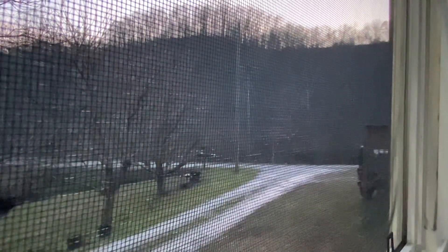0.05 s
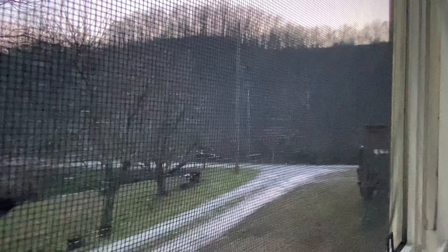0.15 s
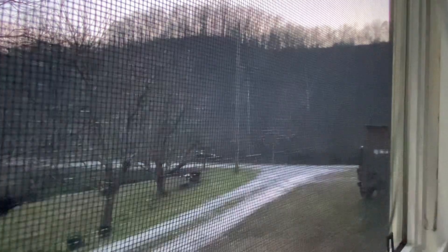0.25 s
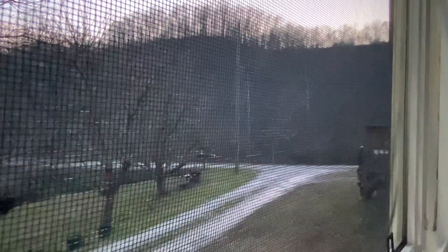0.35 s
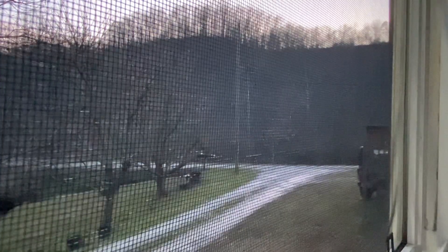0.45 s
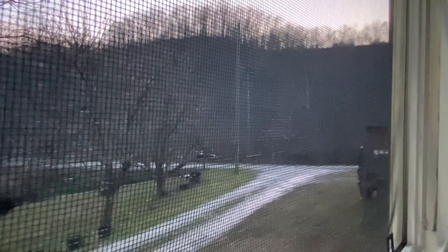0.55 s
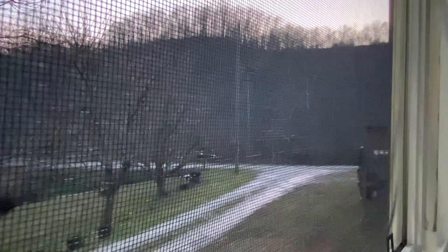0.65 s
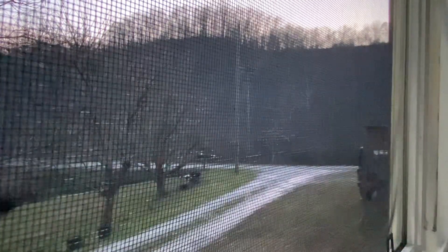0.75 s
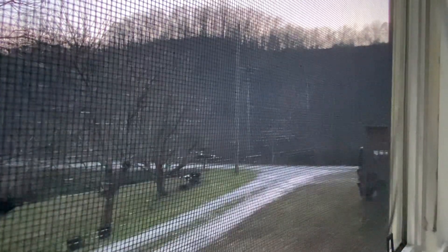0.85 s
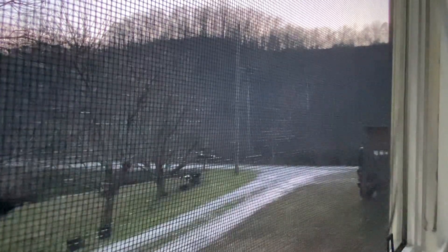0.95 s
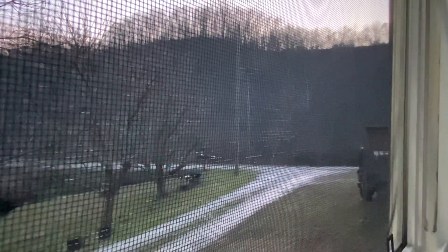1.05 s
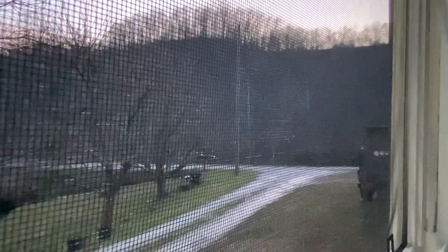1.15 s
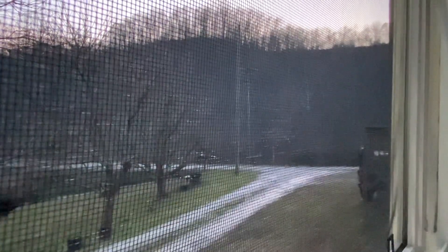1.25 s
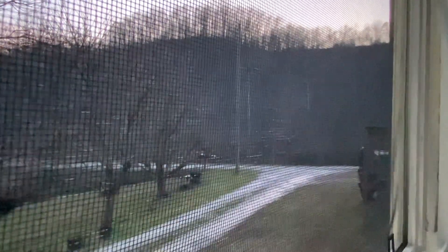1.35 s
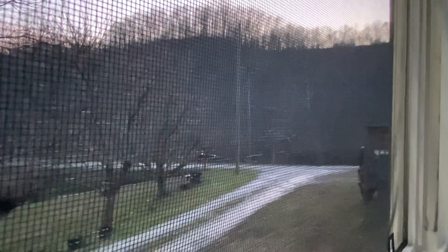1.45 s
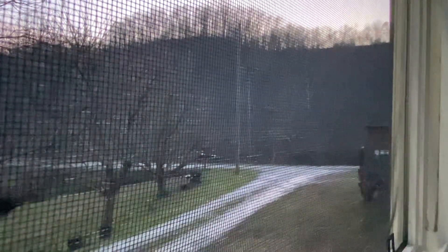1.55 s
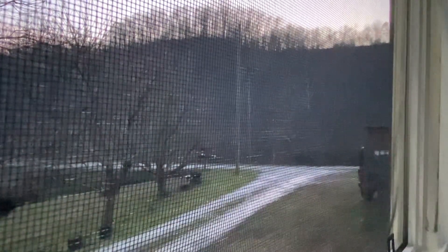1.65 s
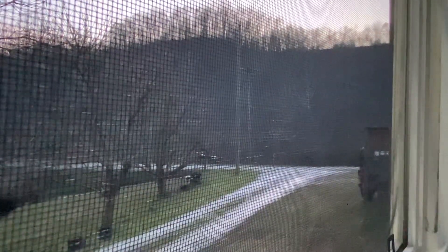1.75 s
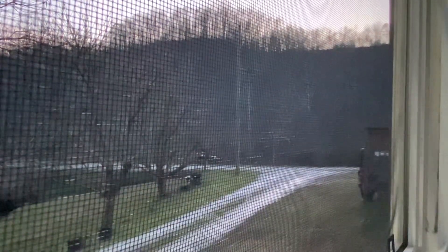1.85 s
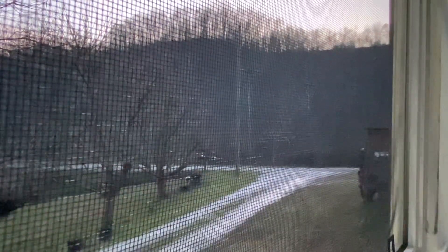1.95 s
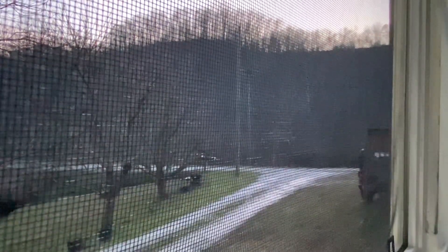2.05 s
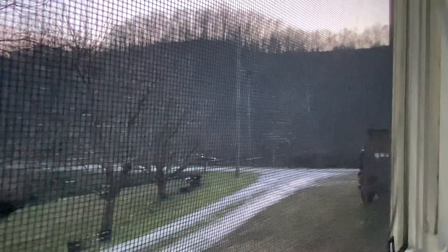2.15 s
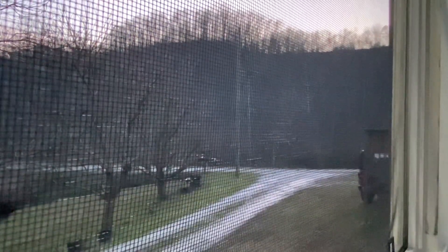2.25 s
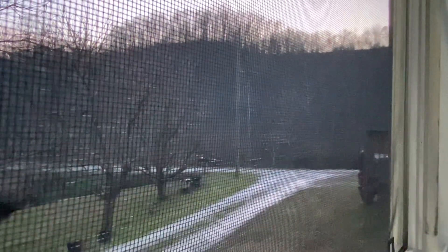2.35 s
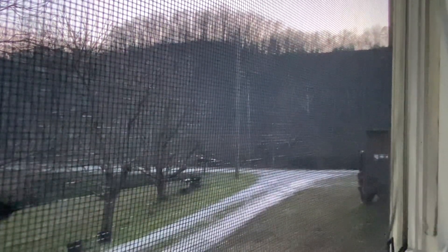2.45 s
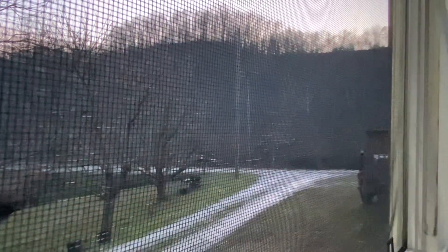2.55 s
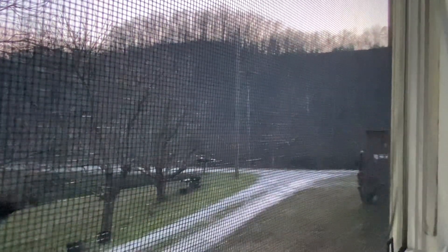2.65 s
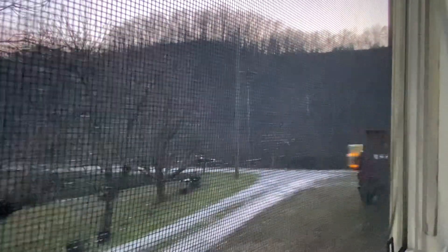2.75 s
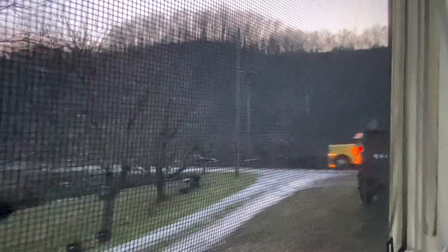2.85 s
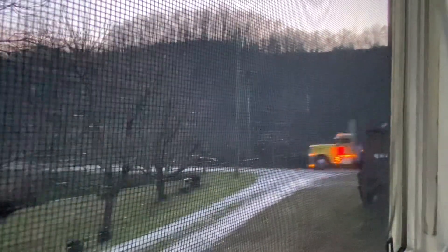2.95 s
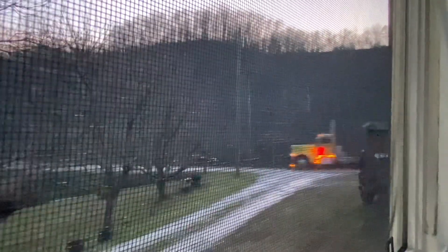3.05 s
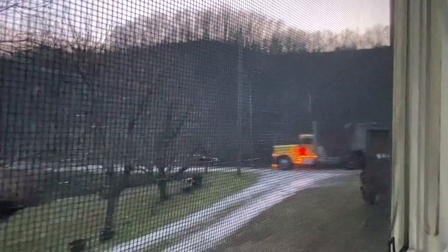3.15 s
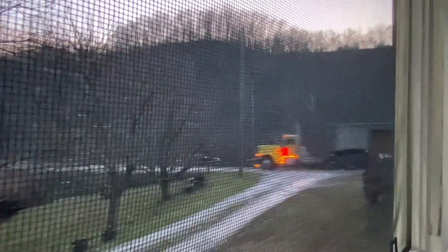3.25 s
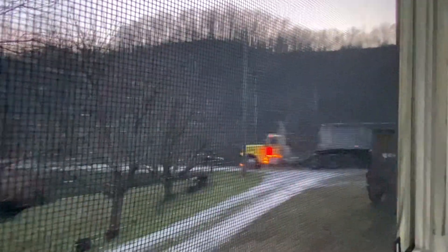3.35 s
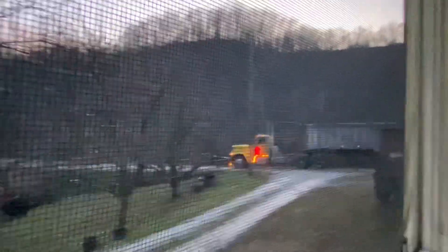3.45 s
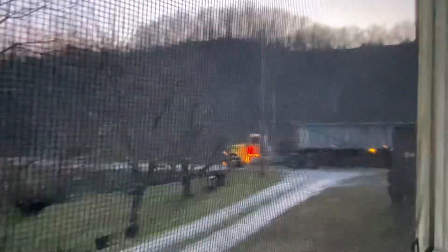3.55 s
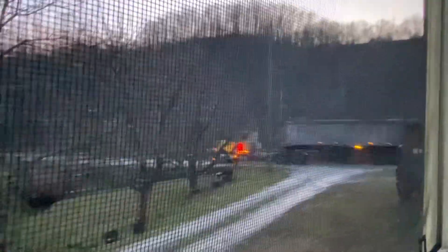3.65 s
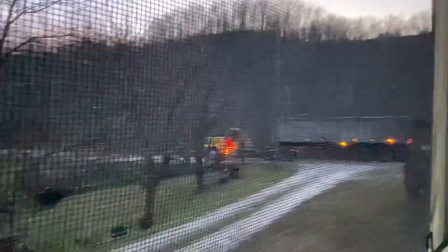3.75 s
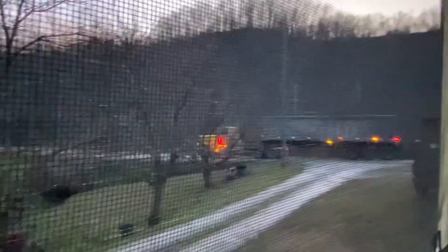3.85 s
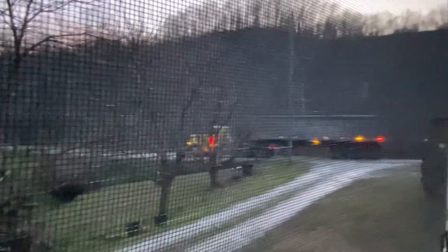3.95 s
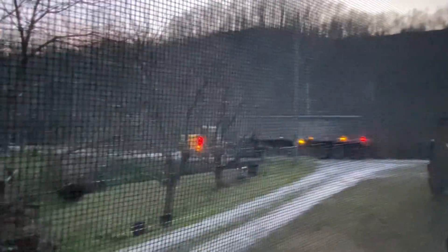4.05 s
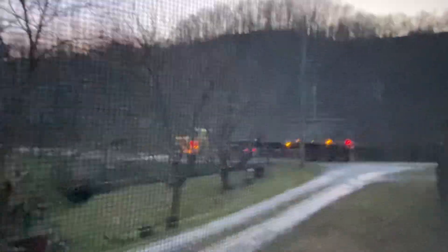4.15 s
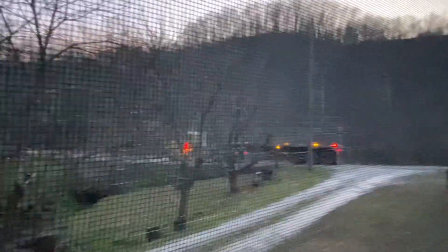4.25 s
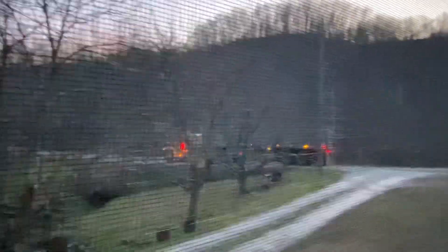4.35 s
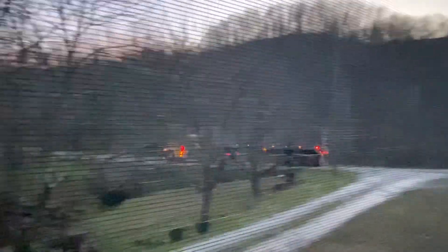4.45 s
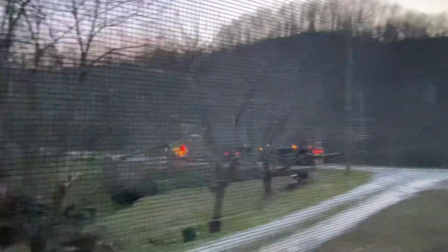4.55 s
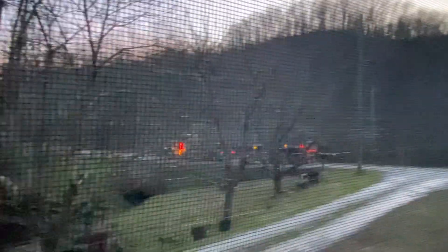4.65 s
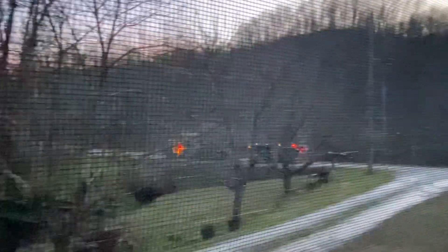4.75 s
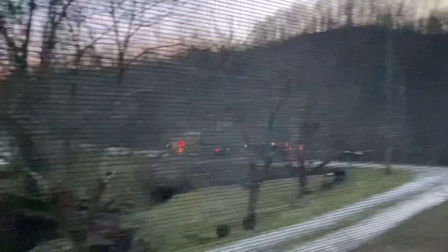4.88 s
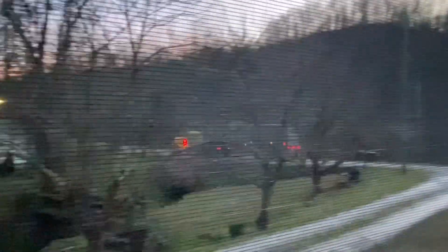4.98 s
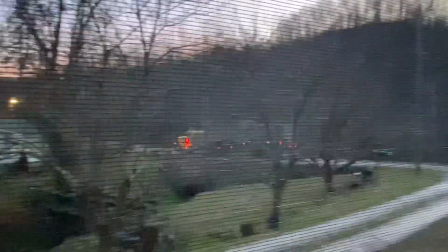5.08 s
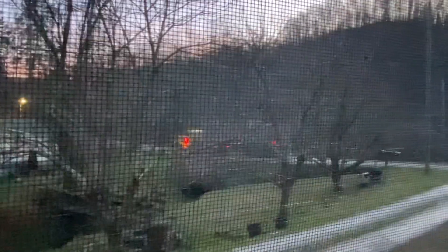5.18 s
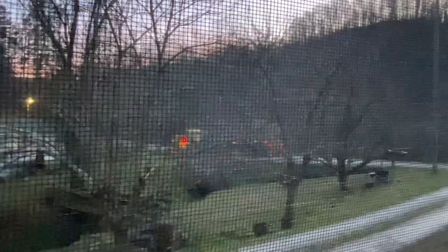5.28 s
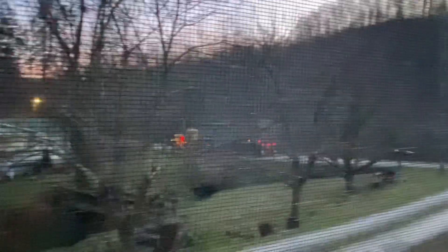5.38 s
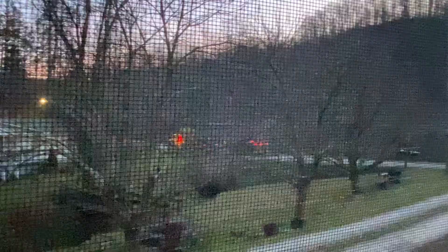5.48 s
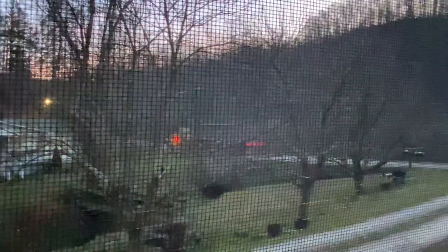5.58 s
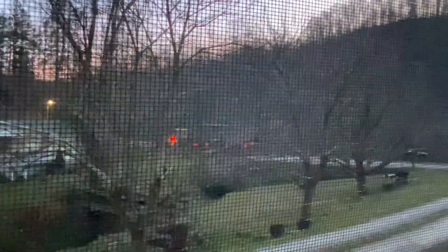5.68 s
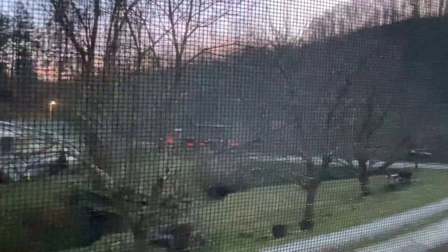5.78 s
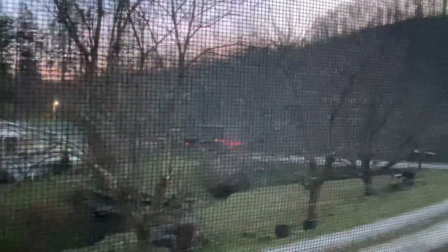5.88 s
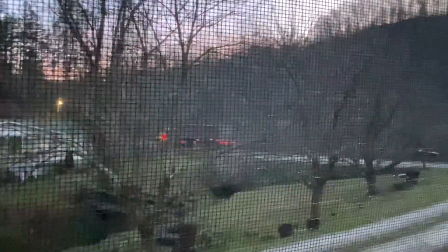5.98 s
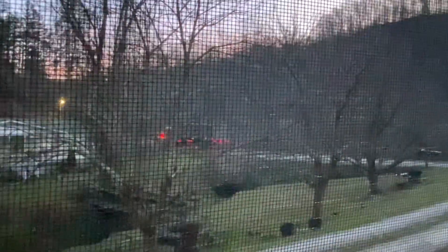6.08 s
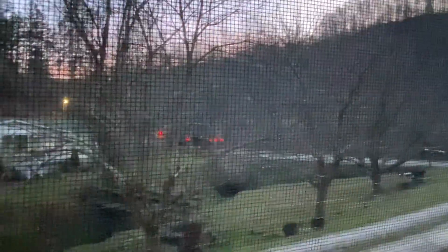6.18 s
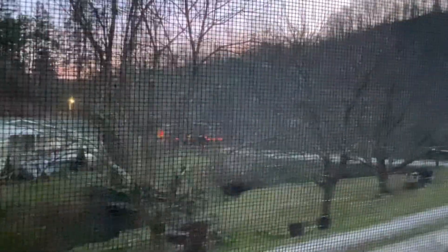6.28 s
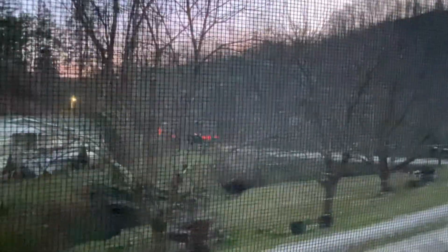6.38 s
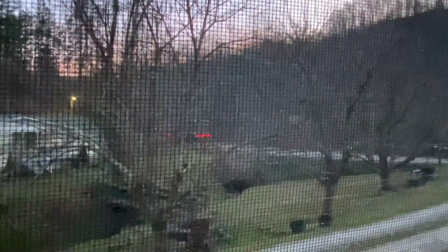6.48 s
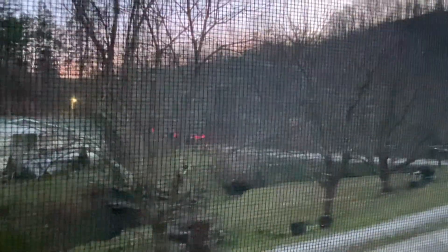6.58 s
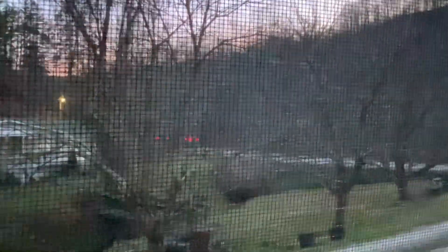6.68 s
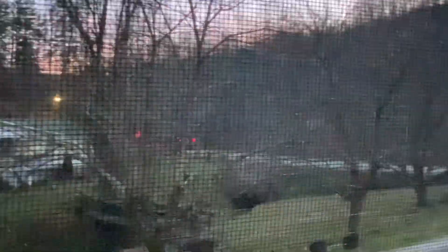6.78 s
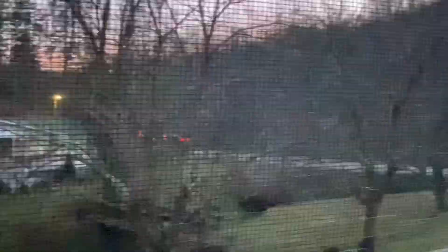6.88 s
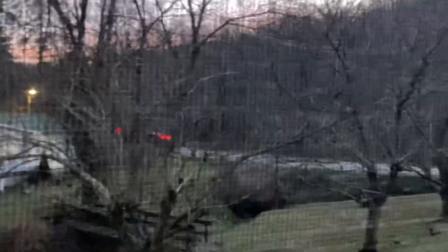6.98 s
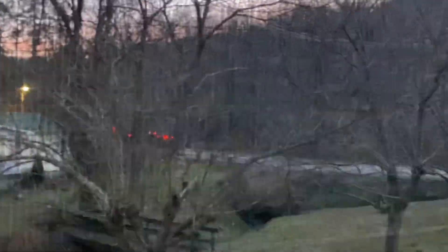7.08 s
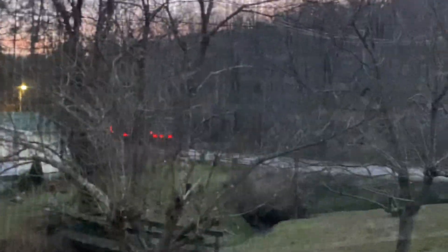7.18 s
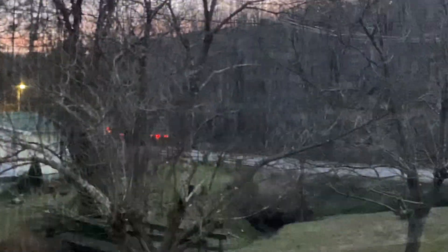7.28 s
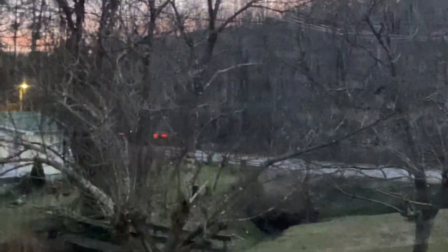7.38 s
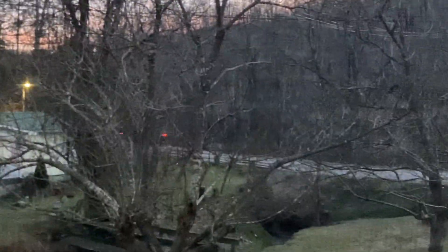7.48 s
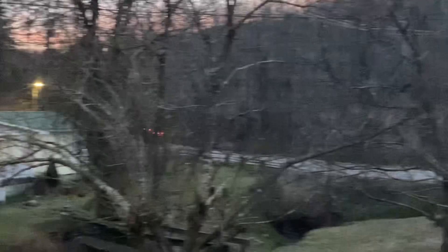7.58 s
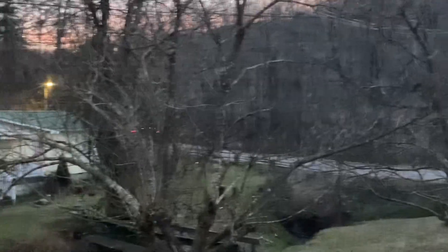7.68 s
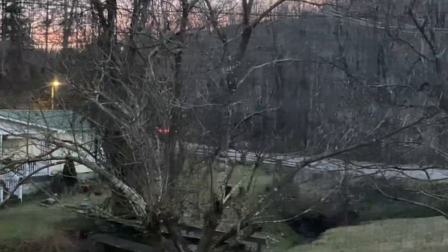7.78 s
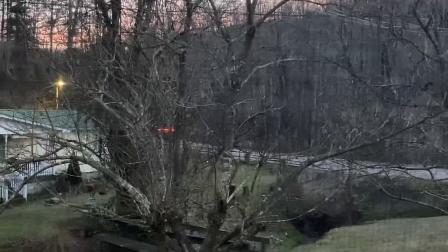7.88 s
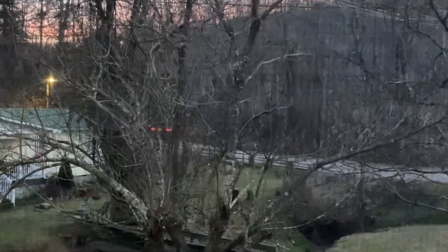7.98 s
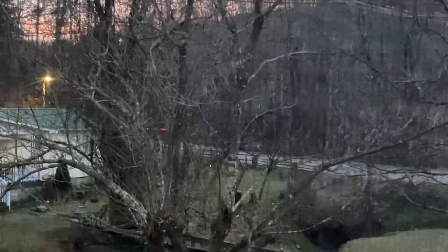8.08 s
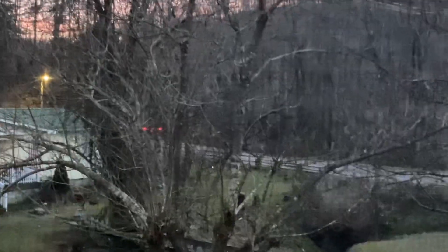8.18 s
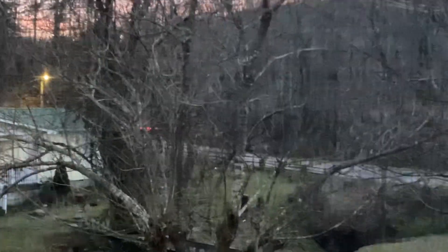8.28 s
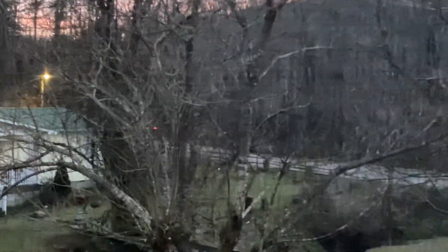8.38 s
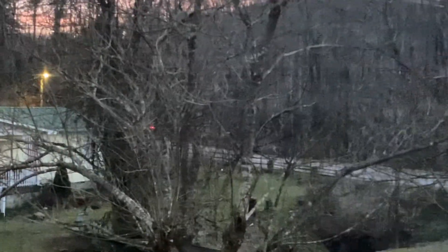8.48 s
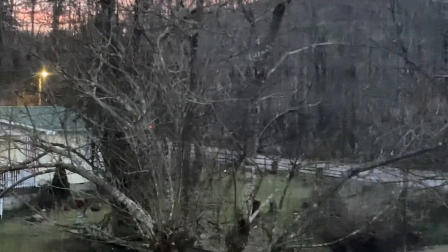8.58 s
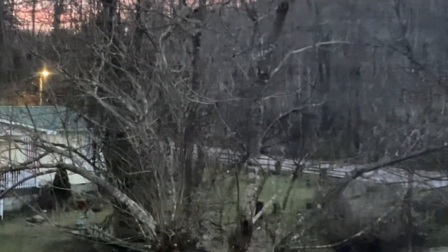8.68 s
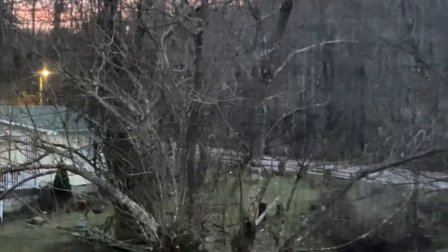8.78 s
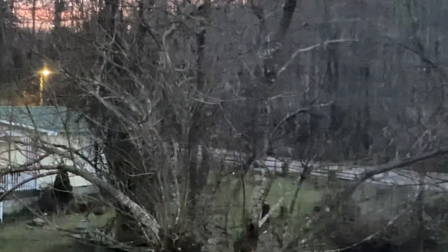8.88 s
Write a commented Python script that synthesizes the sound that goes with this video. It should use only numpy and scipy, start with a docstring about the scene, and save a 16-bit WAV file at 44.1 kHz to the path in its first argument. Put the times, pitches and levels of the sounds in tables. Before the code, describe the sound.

A heavy diesel truck hums, then drives past with a deep drone and rushing tyres, and fades into the distance.

```python
"""A loaded six-cylinder diesel truck, heard through an open window. At first it hums behind a house,
and a few small ticks sound close by. After two seconds it comes out and passes: the exhaust drones and
beats against its own echoes, the engine roars, the tyres rush, dull thumps sound and the turbo whistles.
Near 6.25 s the throttle lifts and the truck draws away up a valley. The stereo picture narrows,
and at 7.5 s a bark and a puff open one more swell of the low drone."""
import sys
import numpy as np
from scipy import signal
from scipy.fft import rfft, irfft, next_fast_len
from scipy.io import wavfile
from scipy.ndimage import uniform_filter1d, map_coordinates

SR = 44100
rng = np.random.default_rng(int(sys.argv[2]) if len(sys.argv) > 2 else 0)


def dump(signal):
    """Clip the signal to [-1, 1] and save it as 16-bit WAV at the path in sys.argv[1]."""
    limited = np.clip(np.atleast_2d(signal).T, -1, 1)
    pcm = np.round(limited * 32767).astype(np.int16)
    wavfile.write(sys.argv[1], SR, pcm)


N = 393813

# How fast the engine shaft turns, as heard: (time [s], turns a second [Hz])
SHAFT_SPEED = [(0, 20.1), (2.3, 20.5), (2.8, 20.8), (3.25, 21.1), (3.75, 21.45), (4.3, 21.65), (5.0, 21.8),
               (5.6, 21.9), (6.2, 21.75), (7.6, 21), (8.93, 20.3)]
# How loud each part is as the truck goes by: (time [s], rumble [dB], growl [dB], roar [dB],
# engine block [dB], tyres [dB], tread [dB], hiss [dB], spray [dB])
PASSING_LEVELS = [(0.0, -51, -49, -52, -57, -51, -56, -69, -87),
                  (0.12, -52, -52, -49, -54.5, -55, -57.5, -69, -90),
                  (1.71, -46.5, -48, -46, -49, -49.5, -52, -63, -78),
                  (2.11, -37.5, -45, -42, -46, -46.5, -48.5, -61.5, -71.5),
                  (2.69, -33, -37.5, -30, -31, -36, -44.5, -51.5, -62),
                  (2.96, -39, -36, -26, -32, -33, -45.5, -48.5, -55),
                  (3.11, -29, -36, -25, -28, -29, -41, -43, -52),
                  (3.45, -31, -29.5, -28.5, -26.5, -31.5, -39.5, -41.5, -48),
                  (3.53, -24.5, -34, -23.5, -23.5, -30, -41, -40, -48),
                  (3.58, -28.5, -31, -22, -27, -30, -37.5, -41, -47.5),
                  (3.73, -20, -33.5, -22.5, -28.5, -30.5, -37.5, -39.5, -50.5),
                  (3.93, -24, -33, -24.5, -31, -28, -37, -42, -50),
                  (4.18, -25.5, -29.5, -23, -31, -32, -40.5, -43, -52.5),
                  (4.8, -26.5, -32.5, -24, -30.5, -33.5, -41, -46, -57),
                  (5.62, -35.5, -34.5, -30, -33.5, -36.5, -42, -49.5, -59),
                  (5.97, -31.5, -40, -31, -36, -38.5, -44, -52.5, -61),
                  (6.34, -35, -45, -31.5, -39.5, -39, -49, -54.5, -63),
                  (6.9, -38, -45, -34.5, -43, -39.5, -48.5, -55.5, -65),
                  (7.2, -34, -42, -36, -42.5, -41, -49.5, -55.5, -66),
                  (7.44, -38.5, -43.5, -36.5, -46, -41, -53, -54.5, -71),
                  (7.51, -35, -50, -32.5, -34.5, -50, -50, -55, -69),
                  (7.58, -31.5, -30, -30, -36.5, -39, -50.5, -52, -63.5),
                  (7.78, -35.5, -38, -31, -40.5, -40.5, -52, -52.5, -63),
                  (8.21, -33.5, -36.5, -32.5, -40.5, -42, -53.5, -54, -63),
                  (8.55, -32, -40.5, -36.5, -40, -42.5, -53.5, -54.5, -63.5),
                  (8.9, -34, -39, -32.5, -43, -45.5, -57, -54.5, -65),
                  (8.93, -37, -29, -29, -44, -43, -53, -57, -66)]
def truck():
    """The truck's low and high sounds, each as mid (what both ears share) and side (how they differ)."""
    shaft_hz, = curves(SHAFT_SPEED)
    rumble_db, growl_db, roar_db, block_db, tyre_db, tread_db, hiss_db, spray_db = curves(PASSING_LEVELS)
    turns = np.cumsum(uniform_filter1d(shaft_hz, size=SR // 4)) / SR  # a loaded engine changes speed slowly
    low = exhaust(turns) + exhaust_pipe(turns) + rumble(turns, rumble_db) + growl(turns, growl_db)
    low += roar(turns, roar_db) + engine_block(turns, block_db) + flares(turns) + late_swell(turns)
    low += tyres(turns, tyre_db, tread_db) + dull_thumps() + body_rattle(turns)
    low += hidden_hum() + distant_ringing(block_db)
    high = chain_rattle(turns) + hiss(turns, hiss_db) + spray(turns, spray_db) + top_hiss(spray_db)
    return low, high + turbo() + puff() + faint_squeal()


# The exhaust's two notes: (time [s], firing note [dB], octave above [dB])
EXHAUST_LEVELS = [(0.0, -59.5, -51), (1.2, -57, -53), (1.7, -43, -68), (2.15, -36, -45), (2.35, -31, -34.5),
                  (2.6, -23.5, -27.5), (2.78, -25.5, -16.5), (3.2, -21, -17), (3.5, -21.5, -19),
                  (4.05, -19, -18.5), (4.65, -17.5, -18), (5.08, -23, -21.5), (5.2, -28, -24),
                  (5.33, -18, -32), (5.9, -28, -29.5), (6.2, -30, -37), (6.32, -36.5, -47), (7.5, -51, -53),
                  (7.6, -31, -30), (7.72, -32.5, -26.5), (7.95, -35, -37), (8.3, -37.5, -41.5),
                  (8.93, -35, -62)]
# The echo of each note: (time [s], path difference [wavelengths], level over the direct sound [dB])
FIRING_ECHO = [(0, -9.5, -8), (2.15, -2.5, -8), (3.08, -.5, -20), (3.47, .5, -7), (3.85, 1.5, -12),
               (4.27, 2.5, -7), (4.5, 3.5, -7), (4.8, 4.5, -14), (5.1, 5.5, -2.5), (5.43, 6.5, -15),
               (5.62, 7.5, -9), (6.17, 10.5, -9), (7.44, 20.5, -3), (7.69, 21.5, -5), (7.87, 22.5, -4),
               (8.15, 24.5, -2), (8.93, 30.1, -4)]
OCTAVE_ECHO = [(0, -20.5, -5), (2.27, -8.5, -5), (2.8, -5.5, -22), (3.5, -2.5, -14), (3.85, -.5, -20),
               (4.22, 1.5, -11), (4.6, 3.5, -6), (4.77, 4.5, -14), (4.93, 5.5, -1), (5.05, 6.5, -8),
               (5.25, 7.5, -1), (5.56, 8.5, -3), (5.75, 9.5, -4), (7.52, 24.5, -3), (7.7, 25.3, -22),
               (8.02, 27.5, -6), (8.93, 34, -3)]
def exhaust(turns):
    """Six cylinders fire three times a shaft turn; each firing pushes out one pulse of pressure."""
    firing_db, octave_db = curves(EXHAUST_LEVELS)
    firing = 2 * np.pi * 3 * turns
    note = amp(firing_db) * echoed(firing, FIRING_ECHO)
    octave = amp(octave_db) * echoed(2 * firing - np.pi / 2, OCTAVE_ECHO)  # the crests line up
    return np.sqrt(2) * (note + octave) * amp([[0], [-32]])


# The pipe's ringing, which sinks as the truck goes by: (time [s], pitch [Hz], level [dB])
PIPE_RING = [(2.2, 375, -51.5), (2.76, 374, -25), (2.97, 380.7, -20.5), (3.1, 382.9, -31.5),
             (3.5, 390, -18.5), (3.6, 346.5, -19.5), (3.78, 346, -18), (3.95, 343, -16.5), (4.15, 356, -25),
             (4.7, 333, -27), (5.1, 324.6, -49), (6.05, 298, -29.5), (6.5, 296.4, -52)]
def exhaust_pipe(turns):
    """The pipe boosts the shaft tones nearest its own pitch, and rings with the noise of burning fuel."""
    pipe_hz, db = curves(PIPE_RING)
    shaft_hz = np.gradient(turns) * SR
    reach_hz = 5.4
    tones = np.zeros((2, N))
    for multiple in range(12, 23):
        mistuning = (multiple * shaft_hz - pipe_hz) / reach_hz
        boost = 0.12 + 1 / (1 + mistuning ** 2)
        extra_db = 2.5 * (multiple % 3 == 0)  # multiples of the firing rate stand out
        tones += boost * shaft_tones([(multiple, extra_db)], turns, fade_db=2, drift_rad=0.35, side_db=-4)
    ring = narrow_noise(PIPE_RING, width_hz=123, gain_db=-8.5, swell=throb(turns, 0.3))
    return tones * amp(db - 8) * fade_ends(PIPE_RING, 0.4) + ring


# Low tones from unequal cylinders: (pitch [times shaft speed], level over the rumble [dB])
RUMBLE_TONES = [(2, -20.5), (4, -13), (5, -11.5), (7, -19)]
# The tone colour of the rumble and of the deep noise under it: (frequency [Hz], level [dB])
RUMBLE_COLOUR = [(20, -120), (45, -22.5), (62, 16.5), (90, 20.5), (130, 16.5), (165, -22.5), (330, -120)]
DEEP_COLOUR = [(8, -120), (15, -42), (25, -11), (35, 24), (45, 40), (60, 25), (75, -58), (150, -120)]
def rumble(turns, db):
    """Unequal cylinders add weak, low tones, heard over two layers of deep noise."""
    tones = shaft_tones(RUMBLE_TONES, turns, fade_db=5, drift_rad=0.68, side_db=-20)
    deep = follow(db, offset_db=-7.5, swing=0.69) * wide_noise(DEEP_COLOUR, random_swells())
    return amp(db) * (tones + wide_noise(RUMBLE_COLOUR, random_swells())) + deep


# Tones in the growl: (pitch [times shaft speed], level over the growl [dB])
GROWL_TONES = [(8, -12.5), (9, -12), (10, -9), (11, -17.5)]
# The tone colour of the growl: (frequency [Hz], level [dB])
GROWL_COLOUR = [(60, -120), (120, -21), (150, 12.5), (175, 8.5), (205, 17), (235, -0.5), (280, -26),
                (560, -120)]
def growl(turns, db):
    """Higher shaft tones and swelling noise, just above the rumble."""
    tones = shaft_tones(GROWL_TONES, turns, fade_db=4, drift_rad=0.73, side_db=-2.5)
    return amp(db) * (tones + amp(-1.5) * wide_noise(GROWL_COLOUR, random_swells()))


# The tone colour of the roar: (frequency [Hz], level [dB])
ROAR_COLOUR = [(140, -31), (235, -2.5), (333, -1), (372, -1), (440, -2), (480, -10.5), (620, -42.5),
               (1060, -120)]
def roar(turns, db):
    """Burning fuel makes a noise that swells at each firing."""
    return amp(db - 3.5) * wide_noise(ROAR_COLOUR, throb(turns, 0.23))


# The tone colour of the engine block: (frequency [Hz], level [dB])
BLOCK_COLOUR = [(280, -34.5), (480, 1), (533, 0.5), (611, 1), (663, 2), (780, -4), (1010, -36.5),
                (1720, -120)]
# Its ringing: (time [s], pitch [Hz], level [dB])
BLOCK_NOTE = [(2.5, 741.5, -39), (2.8, 735, -32.5), (3.12, 721, -24), (3.5, 700, -35), (3.8, 677, -38)]
def engine_block(turns, db):
    """The engine's metal body gives off throbbing noise and a ring that sinks as it passes."""
    noise = amp(db) * wide_noise(BLOCK_COLOUR, throb(turns, 0.18))
    return noise + narrow_noise(BLOCK_NOTE, width_hz=39, gain_db=-4.5, swell=throb(turns, 0.17))


# Brief engine tones: (time [s], pitch [times shaft speed], level [dB], rise and fall time [s])
FLARING_TONES = [(2.3, 4.5, -38, .25), (2.4, 12, -39, .15), (2.45, 13.5, -43, .12), (2.55, 10.5, -40, .2),
                 (2.85, 15, -32, .15), (3.07, 12, -28, .06), (3.28, 18, -30, .22), (4.5, 15, -31, .35),
                 (3.32, 25, -33, .05), (3.4, 7, -28, .2), (3.45, 21, -32, .18), (3.52, 25, -30, .07),
                 (4.05, 19, -28, .07), (4.28, 10, -30, .07), (5.45, 20, -35, .2), (5.6, 9.5, -34, .25),
                 (6.0, 14, -33, .3), (6.6, 20, -38, .12), (7.62, 15, -31, .09), (8.3, 15, -35, .13),
                 (8.72, 12, -39, .3), (8.55, 20, -41, .3)]
def flares(turns):
    """Single shaft tones that each swell and fade once."""
    t = np.arange(N) / SR
    out = np.zeros((2, N))
    for peak_s, multiple, db, rise_s in FLARING_TONES:
        swell = np.exp(-((t - peak_s) / rise_s) ** 2)
        out += swell * shaft_tones([(multiple, db)], turns, fade_db=3, drift_rad=1, side_db=-6)
    return out


# The lower and upper parts of the late swell: (time [s], pitch [Hz], level [dB])
SWELL_LOWER = [(7.2, 300, -62), (7.5, 290, -51), (7.545, 285, -24), (7.62, 310, -27), (7.7, 322, -33),
               (7.85, 310, -34), (8.3, 325, -34), (8.93, 310, -36), (9.7, 310, -36)]
SWELL_UPPER = [(7.2, 690, -62), (7.46, 690, -55), (7.52, 690, -40), (7.75, 670, -44), (8.35, 700, -42),
               (8.93, 680, -46.5), (9.7, 680, -45)]
def late_swell(turns):
    """A rough growl, throbbing with the firings, that rises when the truck is far up the valley."""
    lower = narrow_noise(SWELL_LOWER, width_hz=102, gain_db=0, swell=throb(turns, 0.2))
    return lower + narrow_noise(SWELL_UPPER, width_hz=200, gain_db=-1, swell=throb(turns, 0.2))


# The tone colour of the rolling tyres and of their tread: (frequency [Hz], level [dB])
TYRE_COLOUR = [(460, -26.5), (780, -5), (877, 0.5), (955, -2.5), (1080, -5), (1240, -5), (1340, -13),
               (1450, -11.5), (1880, -39), (3190, -120)]
TREAD_COLOUR = [(850, -29), (1450, -5), (1610, -1), (1980, -0.5), (2350, -5), (2700, -11), (3510, -35),
                (5940, -120)]
# The tyres' note as they pass, and their whine as they leave: (time [s], pitch [Hz], level [dB])
PASSING_NOTE = [(2.3, 960, -45.5), (2.84, 937, -33), (3.2, 960, -43), (3.44, 1029, -24), (3.7, 1049, -28.5),
                (3.85, 946, -24), (4.3, 890, -32), (4.5, 863, -26), (4.8, 875.4, -39.5), (7.4, 956, -43.5)]
LEAVING_WHINE = [(4.6, 1950, -56), (5.05, 1960, -48), (5.3, 1970, -44.5), (5.7, 1990, -46.5),
                 (5.85, 2000, -52), (6.3, 2000, -52), (6.8, 2000, -66), (7.9, 2000, -60)]
def tyres(turns, tyre_db, tread_db):
    """Tyres rolling on the road make a broad rush, a breathy note with a clearer core, and a whine."""
    rolling = amp(tyre_db - 1) * wide_noise(TYRE_COLOUR, throb(turns, 0.033))
    tread = amp(tread_db) * wide_noise(TREAD_COLOUR, throb(turns, 0.074))
    note = narrow_noise(PASSING_NOTE, width_hz=140, gain_db=-7, swell=throb(turns, 0.46))
    core = narrow_noise(PASSING_NOTE, width_hz=25, gain_db=-9.5)
    whine = narrow_noise(LEAVING_WHINE, width_hz=210, gain_db=2.5)
    return rolling + tread + note + core + whine


# Thumps, then the bark: (time [s], level [dB], pitch [Hz], time to fade by 60 dB [s])
THUMPS = [(2.978, -21, 700, .08), (3.421, -17, 600, .1), (4.477, -20, 850, .07), (7.499, -24, 600, .25),
          (7.527, -16, 480, .2), (7.553, -17, 260, .4)]
def dull_thumps():
    """Three short, dull bursts of noise during the pass, then the bark that opens the late swell."""
    return bursts(THUMPS, octaves=0.9, attack_s=0.0012) * amp([[0], [-14]])


# The rattle of the truck's body: (time [s], pitch [Hz], level [dB])
BODY_BAND = [(2.6, 1830, -49), (3.22, 1822, -36), (3.42, 1880, -39), (3.5, 1940, -33), (3.56, 1960, -32.5),
             (3.67, 1928, -33.5), (3.72, 1900, -40), (3.86, 1880, -39), (4.0, 1750, -42), (4.9, 1650, -50),
             (5.6, 1650, -55)]
def body_rattle(turns):
    """The body shakes unevenly with the firings."""
    return narrow_noise(BODY_BAND, width_hz=420, gain_db=-4, swell=shaking(turns))


# The rattle of a chain: (time [s], pitch [Hz], level [dB])
CHAIN_BAND = [(1.9, 3990, -69), (2.45, 4000, -55.5), (2.9, 4010, -51), (3.3, 4100, -46),
              (3.45, 4280, -41.5), (3.55, 4300, -38.5), (3.66, 4300, -38.5), (3.71, 4050, -43),
              (3.76, 3900, -38.5), (3.9, 3900, -40), (4.05, 3950, -41.5), (4.2, 3950, -45),
              (4.48, 3850, -44), (5.2, 3770, -50)]
def chain_rattle(turns):
    """A chain shakes with the firings, brighter than the body."""
    return narrow_noise(CHAIN_BAND, width_hz=620, gain_db=-2, swell=shaking(turns))


# The tone colour of the hiss: (frequency [Hz], level [dB])
HISS_COLOUR = [(1590, -33.5), (2700, 0.5), (3020, -1), (3430, -1.5), (3790, -3.5), (4410, -6.5),
               (5190, -6.5), (5900, -16.5), (7670, -37), (13000, -120)]
def hiss(turns, db):
    """A lightly flickering hiss, loudest as the truck passes."""
    return amp(db - 0.5 + 0.63 * wobble(8)) * wide_noise(HISS_COLOUR, throb(turns, 0.03))


# The tone colour of the spray: (frequency [Hz], level [dB])
SPRAY_COLOUR = [(3500, -120), (5200, -13.5), (6000, 1.5), (7000, -0.5), (7800, -4.5), (8300, -12.5),
                (8700, -47.5), (11000, -120)]
# How much its top is turned up or down: (time [s], gain [dB])
SPRAY_BRIGHTNESS = [(0, 3), (2.2, -2), (2.8, 6), (3.5, -4.5), (6.8, -2), (7.6, -5.5), (8.93, -14)]
def spray(turns, db):
    """A fine, flickering sizzle whose top brightens and dulls as the truck goes by."""
    sizzle = amp(db + 1.1 * wobble(8.8)) * wide_noise(SPRAY_COLOUR, throb(turns, 0.11))
    top_db, = curves(SPRAY_BRIGHTNESS)
    return sizzle + (amp(top_db) - 1) * treble(sizzle, above_hz=6900, steepness=12)


# The tone colour of the very highest hiss: (frequency [Hz], level [dB])
TOP_HISS_COLOUR = [(7000, -120), (8300, -12), (10000, 0), (11500, -3), (12500, -14), (14500, -22),
                   (16000, -40), (18000, -120)]
def top_hiss(spray_db):
    """The highest hiss rises and falls with the spray, then fades quickly after 7.5 s."""
    fade_from_s, loss_db_per_s = 7.5, 20
    loss_db = loss_db_per_s * np.clip(np.arange(N) / SR - fade_from_s, 0, None)
    level = follow(spray_db, offset_db=-10.5, swing=1.104) * amp(1.3 * wobble(9.6) - loss_db)
    return level * wide_noise(TOP_HISS_COLOUR, 1)


# The turbo's whistle: (time [s], pitch [Hz], level [dB])
TURBO_WHISTLE = [(3.7, 5930, -62), (3.83, 6010, -54), (3.98, 6070, -53), (4.12, 6075, -53),
                 (4.26, 6060, -51), (4.4, 6000, -55), (4.55, 5870, -58), (4.7, 5760, -64)]
def turbo():
    """The spinning turbo gives a thin whistle that wavers in pitch and dips quickly in level."""
    hz, db = curves(TURBO_WHISTLE)
    waver_hz, dip_db = 22, 7
    phase = 2 * np.pi * np.cumsum(hz + waver_hz * wobble(60)) / SR
    level = amp(db + 6 - dip_db * np.abs(wobble(30))) * fade_ends(TURBO_WHISTLE, 0.071)
    return np.sqrt(2) * np.sin(phase) * level * amp([[0], [-6]])


# One puff: (time [s], level [dB], pitch [Hz], time to fade by 60 dB [s])
PUFF_BURST = [(7.487, -43.5, 5000, 0.49)]
def puff():
    """A short hiss that opens the late swell."""
    return bursts(PUFF_BURST, octaves=0.1, attack_s=0.004)


# A low hum at about four times shaft speed, and a thin one above: (time [s], pitch [Hz], level [dB])
LOW_HUM = [(0.0, 80.5, -49), (0.9, 80.6, -45), (1.7, 80.94, -41), (2.3, 84, -50)]
THIN_HUM = [(0.0, 380.6, -51), (1.4, 380.7, -56.5), (2.4, 388.8, -77)]
def hidden_hum():
    """Two hums that are clear while the truck is still behind the house."""
    return hum(LOW_HUM, waver_hz=0.63, side_db=-36) + hum(THIN_HUM, waver_hz=3.3, side_db=-4)


# Ringing as the truck leaves, and while it is hidden: (pitch [Hz], width [Hz], level over the block [dB])
LEAVING_BANDS = [(430.6, 18.2, -4.5), (881, 38, -13), (960, 54, -9.5), (1262, 130, -8.5), (1413, 65, -12.5),
                 (3040, 250, -19.5)]
HIDDEN_BANDS = [(577, 24, -4.5), (854, 24, -13.5), (4500, 170, -26.5)]
def distant_ringing(block_db):
    """Narrow bands of noise at steady pitches, rising and falling with the engine block's level."""
    out = np.zeros((2, N))
    for bands, start_s, end_s in (LEAVING_BANDS, 4.79, 7.94), (HIDDEN_BANDS, -1, 3.03):
        for hz, width_hz, db in bands:
            out += narrow_noise([(start_s, hz, db), (end_s, hz, db)], width_hz, gain_db=0, swell=0.96)
    return amp(block_db) * out


# A thin, high squeal: (time [s], pitch [Hz], level [dB])
SQUEAL_BAND = [(6.3, 5350, -76), (6.9, 5350, -69), (7.12, 5300, -66), (7.2, 5170, -68), (7.35, 5150, -67),
               (7.45, 5150, -72), (8.2, 5150, -76)]
def faint_squeal():
    """A faint squeal flickers as the truck draws away."""
    return narrow_noise(SQUEAL_BAND, width_hz=360, gain_db=-1, swell=amp(3 * wobble(20)))


# Small ticks: (time [s], level [dB], pitch [Hz], time to fade by 60 dB [s])
NEARBY_TICKS = [(1.197, -52, 3800, .06), (1.2685, -36, 3000, .05), (1.283, -58, 7000, .05),
                (1.289, -41, 4400, .04), (1.297, -57, 5000, .16)]
def ticks():
    """A quick rattle of dry clicks close by."""
    return bursts(NEARBY_TICKS, octaves=0.8, attack_s=0.00047) * amp([[0], [-5]])


def echoed(phase, echo):
    """A tone plus its echo; the echo's path changes as the truck moves, so the two beat."""
    wavelengths, db = curves(echo)
    return np.sin(phase) + amp(db) * np.sin(phase + 2 * np.pi * wavelengths)


def shaft_tones(rows, turns, fade_db, drift_rad, side_db):
    """Pure tones at multiples of the shaft speed; moving echoes fade each one and blur its phase."""
    out = np.zeros((2, N))
    for multiple, db in rows:
        phase = 2 * np.pi * multiple * turns + drift_rad * wobble(5) + 2 * np.pi * rng.random()
        level = np.sqrt(2) * amp(db + fade_db * wobble(3.008))
        out += level * np.array([np.sin(phase), amp(side_db) * wobble(1.7) * np.cos(phase)])
    return out


def hum(rows, waver_hz, side_db):
    """A pure tone, slightly unsteady in pitch and level."""
    hz, db = curves(rows)
    phase = 2 * np.pi * np.cumsum(uniform_filter1d(hz, size=SR) + waver_hz * wobble(5.9)) / SR
    level = np.sqrt(2) * amp(db + 1.6 * wobble(5.1)) * fade_ends(rows, 0.1)
    return level * np.array([np.sin(phase), amp(side_db) * np.cos(phase)])


# Left and right differ most where the window frame and room ring, and they also differ in the highest treble:
# (frequency [Hz], side over mid [dB])
ROOM_WIDTH = [(60, -32), (150, -5), (250, -11), (380, 1), (550, -4), (750, 2.5), (930, 3), (1150, 1),
              (1400, 6.5), (1600, 0.5), (1800, -1.5), (2100, 5.5), (2500, -3), (3200, -0.5), (4500, 0),
              (9000, 3.5)]
def wide_noise(colour, swell):
    """Broad noise as mid and side, with drifting patches where echoes add up or cancel."""
    patch_db = 1.5
    spectra = signal.stft(rng.standard_normal((2, N)) * swell, nperseg=2048)[2]
    patches = uniform_filter1d(rng.standard_normal(spectra.shape[1:]), size=14, axis=0)  # blur in pitch
    patches = uniform_filter1d(patches, size=12, axis=1)  # blur in time
    pair = signal.istft(spectra * amp(patch_db * unit(patches)), nperseg=2048)[1][:, :N]
    pair = filtered(pair, lambda hz: amp(look_up(colour, hz) + look_up(ROOM_WIDTH, hz) * [[0], [1]]))
    return pair / np.std(pair[0])


def narrow_noise(rows, width_hz, gain_db, swell=1):
    """A flickering band of noise, as mid and side, that follows a table's pitch and level."""
    pitch_hz, db = uniform_filter1d(curves(rows), size=SR // 30, axis=1)
    slow = filtered(rng.standard_normal((4, N)), lambda hz: 1 / (1 + (2 * hz / width_hz) ** 4))
    phase = 2 * np.pi * np.cumsum(pitch_hz) / SR
    pair = unit(slow[:2] * np.cos(phase) + slow[2:] * np.sin(phase)) * swell  # lift it up to the pitch
    flicker_db = 1.2 * wobble(7.5)
    side_db = look_up(ROOM_WIDTH, pitch_hz) * [[0], [1]]
    return pair * amp(db + gain_db + flicker_db + side_db) * fade_ends(rows, 0.97)


def bursts(rows, octaves, attack_s):
    """Bursts of noise that start sharply and die away, each around its own pitch."""
    out, t = np.zeros((2, N)), np.arange(SR // 2) / SR
    hz = np.fft.rfftfreq(len(t), 1 / SR) + 1
    for start_s, db, pitch_hz, fade_s in rows:
        colour = amp(-6 * (np.log2(hz / pitch_hz) / octaves) ** 2)
        noise = irfft(rfft(rng.standard_normal((2, len(t)))) * colour)
        level = amp(db - 11 - 60 * t / fade_s) * (1 - np.exp(-t / attack_s))
        out[:, round(start_s * SR):][:, :len(t)] += level * unit(noise)
    return out


def throb(turns, depth):
    """A gain that swells at each firing, three times a shaft turn."""
    return 1 + depth * np.cos(2 * np.pi * 3 * turns)


def shaking(turns):
    """A deep throb with a fast random flicker, which makes noise rattle."""
    return throb(turns, 0.5) * amp(2 * wobble(45))


def random_swells():
    """A gain that rises and falls gently as echoes shift."""
    return amp(1.2 * wobble(6.5))


def follow(db, offset_db, swing):
    """A gain tied to another level, moving swing dB for each dB that level moves."""
    pivot_db = -40
    return amp(pivot_db + offset_db + swing * (db - pivot_db))


def fade_ends(rows, fade_s):
    """A gain of 1 while a table lasts, fading at both ends."""
    t = np.arange(N) / SR
    return np.clip((t - rows[0][0]) / fade_s + 0.5, 0, 1) * np.clip((rows[-1][0] - t) / fade_s, 0, 1)


def wobble(rate):
    """A smooth random curve through rate new values a second."""
    coarse = np.arange(0, N + 64, 32)
    values = rng.standard_normal(int(N * rate / SR) + 5)
    return np.interp(np.arange(N), coarse, map_coordinates(values, [coarse * rate / SR]))


def curves(rows):
    """Each column after the time, drawn out to one value per sample."""
    times, *columns = np.transpose(rows)
    return [np.interp(np.arange(N) / SR, times, column) for column in columns]


def look_up(rows, hz):
    """A table's value at a frequency, with all octaves spaced evenly."""
    frequencies, values = np.transpose(rows)
    return np.interp(np.log(hz + 1), np.log(frequencies + 1), values)


def filtered(x, response):
    """The sound with each frequency turned up or down by response(hz)."""
    size = next_fast_len(N + SR // 2)
    return irfft(rfft(x, size) * response(np.fft.rfftfreq(size, 1 / SR)), size)[..., :N]


def treble(x, above_hz, steepness):
    """Only the high part of a sound."""
    return filtered(x, lambda hz: 1 / (1 + (above_hz / (hz + 1)) ** steepness))


def amp(db):
    """Decibels turned into a gain."""
    return 10 ** (np.asarray(db) / 20)


def unit(x):
    """Scaled to an average strength (rms) of 1."""
    return x / np.sqrt(np.mean(x ** 2) + 1e-20)


def left_right(pair, width_db):
    """Left is mid plus side, right is mid minus side; more side sounds wider."""
    mid, side = pair
    return mid + side * amp(width_db) * [[1], [-1]]


# How the sound leans to one side: (frequency [Hz], left over right [dB])
SIDE_LEAN = [(60, 2.5), (130, 1.5), (290, 0), (640, 1), (1410, -3), (3100, 3.5), (6820, 3), (15000, -6)]
# The stereo picture: (time [s], left delay [ms], low width [dB], treble width [dB], share of lean [0-1])
STEREO_PICTURE = [(0, -0.35, -4, -1.5, 0.8), (2.2, -0.39, -6.5, -2, 0.82), (2.6, 0.063, -6, -3.5, 1),
                  (4.5, -0.097, -8.5, -4.5, 0.6), (6.2, -0.09, -14, -3.5, 0.36), (6.8, -0.1, -13, -4, 0.4),
                  (7.1, -0.045, -13.5, -33.5, 0.06), (8.93, -0.034, -11, -44, 0.05)]
def scene():
    """The truck and the ticks in stereo; the nearer side hears the low sound first."""
    delay_ms, low_width_db, treble_width_db, lean_share = curves(STEREO_PICTURE)
    low, high = truck()
    top = treble(low, above_hz=2150, steepness=16)  # the treble has its own width
    left, right = left_right(low - top, low_width_db)
    half_delay = delay_ms * SR / 2000  # in samples; each side moves by half
    left = map_coordinates(left, [np.arange(N) - half_delay], mode="nearest")
    right = map_coordinates(right, [np.arange(N) + half_delay], mode="nearest")
    pair = np.array([left, right]) + left_right(high + top + ticks(), treble_width_db)
    leaning = filtered(pair, lambda hz: amp(look_up(SIDE_LEAN, hz) * [[0.5], [-0.5]]))
    return pair + lean_share * fade_ends(STEREO_PICTURE, 0.1) * (leaning - pair)


def record(dry):
    """Cuts off the very highest treble."""
    return filtered(dry, lambda hz: hz < 16354)


dry = scene()
out = record(dry)
dump(out)
```